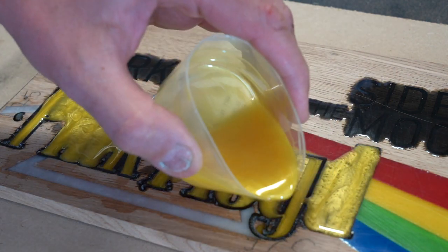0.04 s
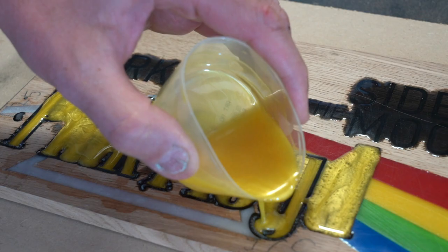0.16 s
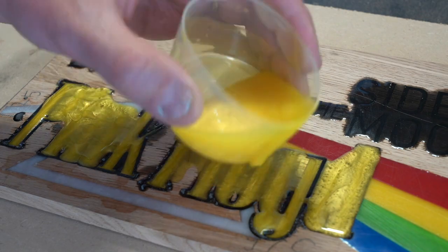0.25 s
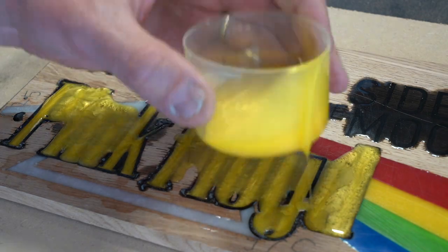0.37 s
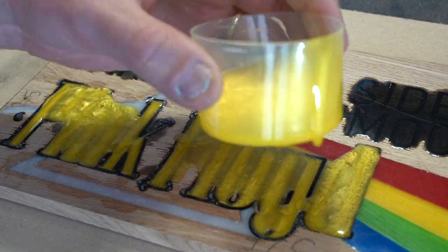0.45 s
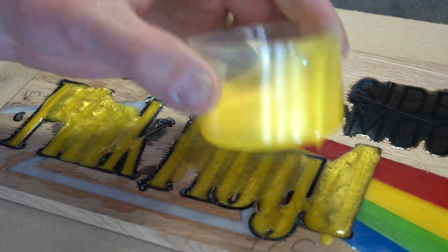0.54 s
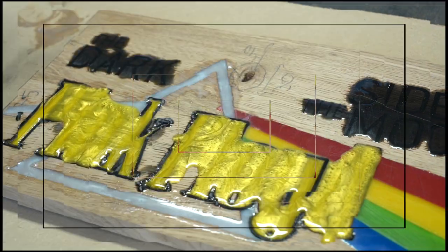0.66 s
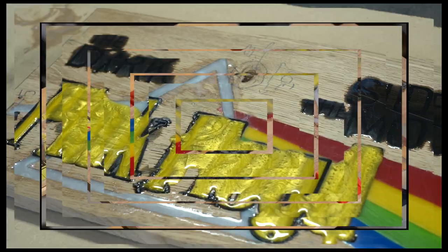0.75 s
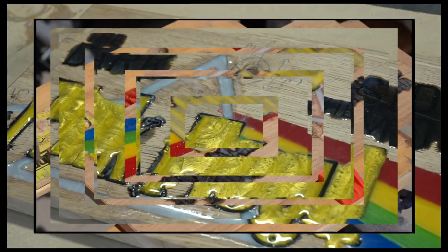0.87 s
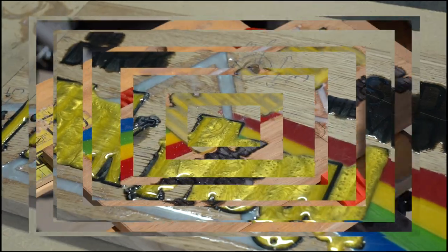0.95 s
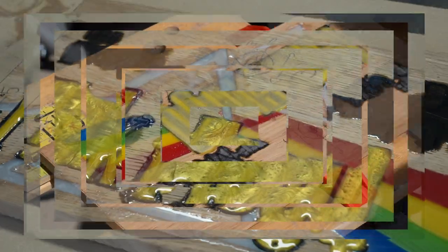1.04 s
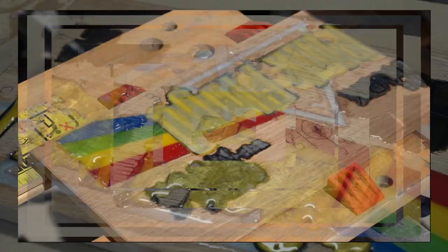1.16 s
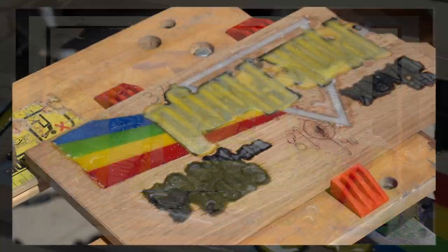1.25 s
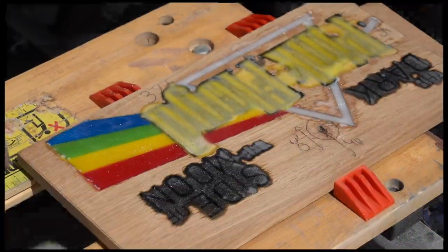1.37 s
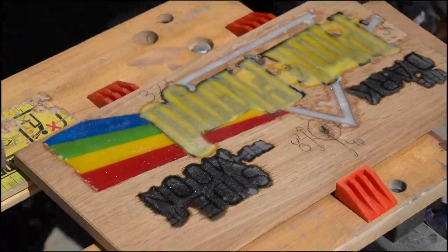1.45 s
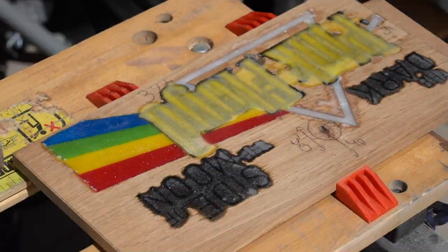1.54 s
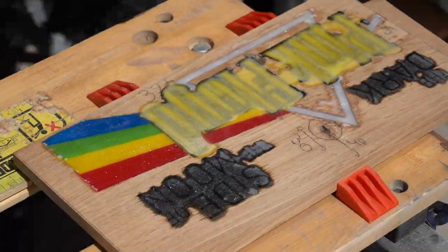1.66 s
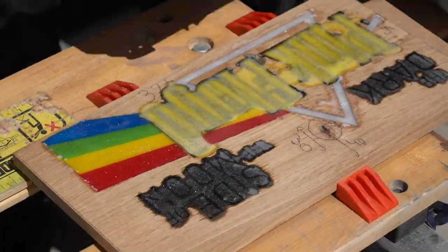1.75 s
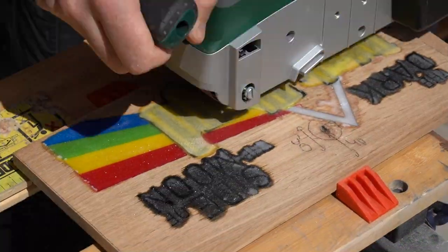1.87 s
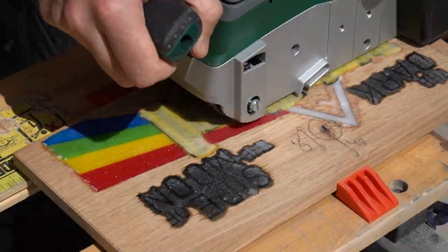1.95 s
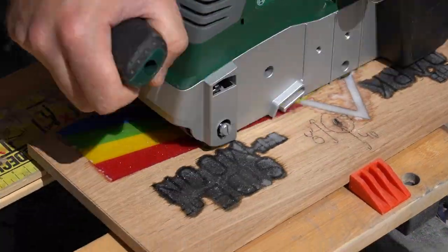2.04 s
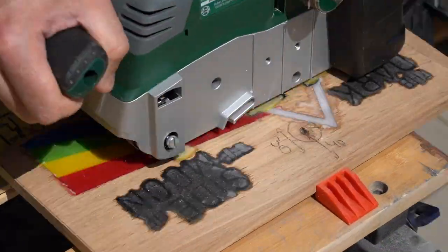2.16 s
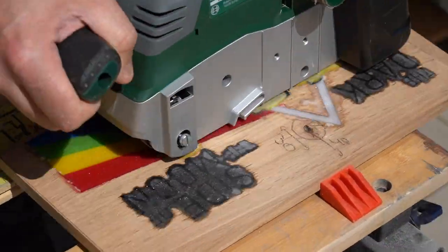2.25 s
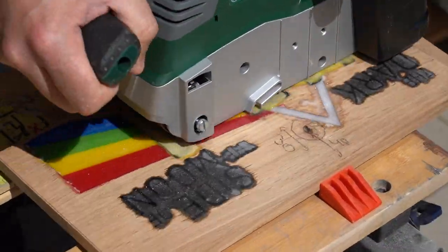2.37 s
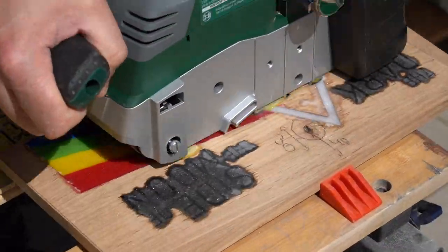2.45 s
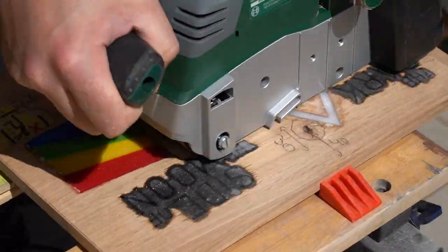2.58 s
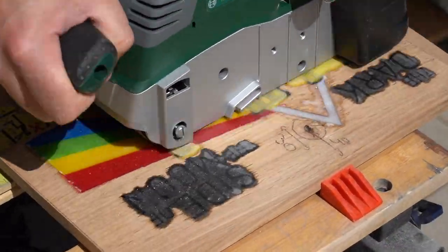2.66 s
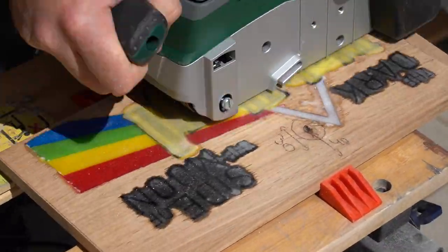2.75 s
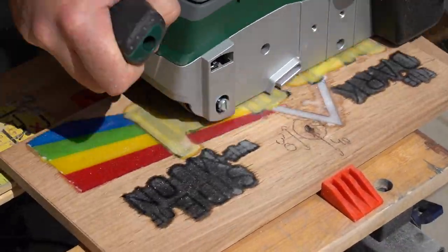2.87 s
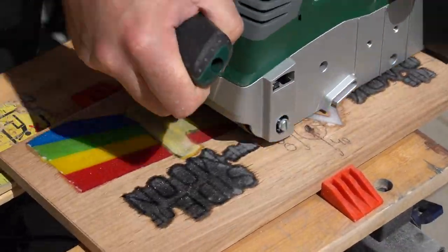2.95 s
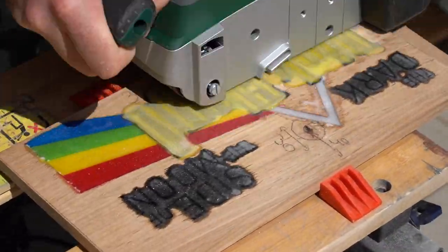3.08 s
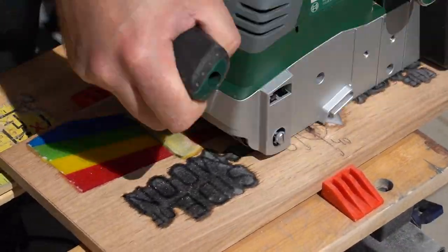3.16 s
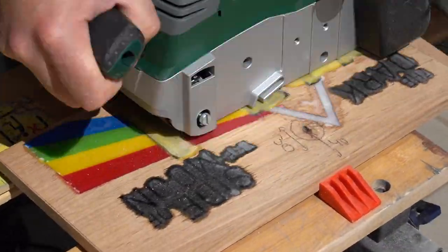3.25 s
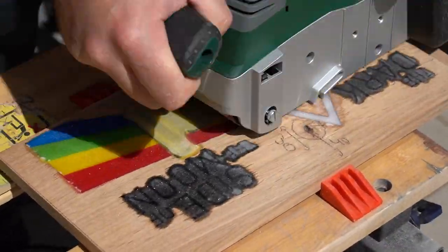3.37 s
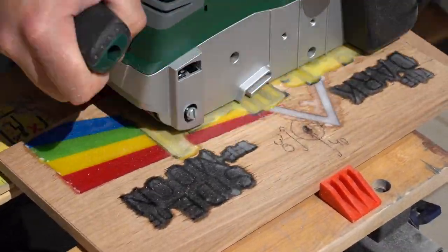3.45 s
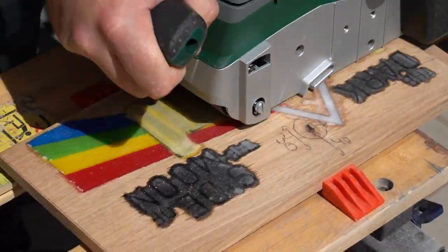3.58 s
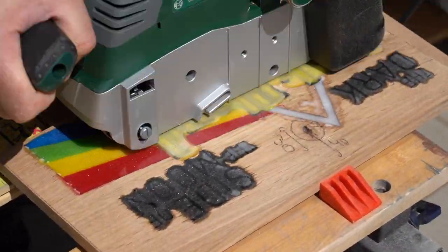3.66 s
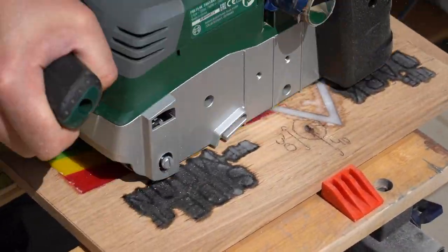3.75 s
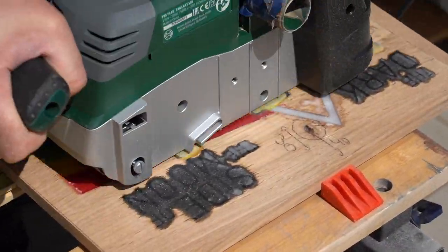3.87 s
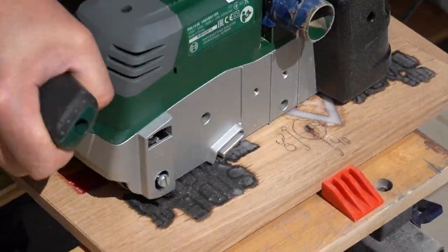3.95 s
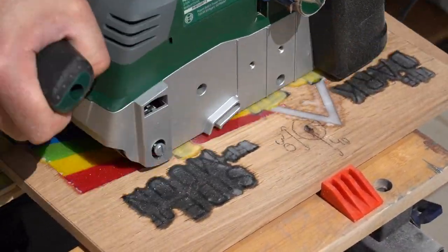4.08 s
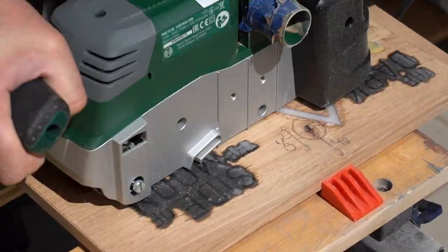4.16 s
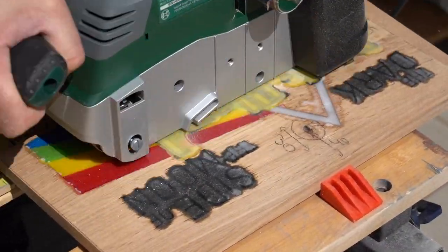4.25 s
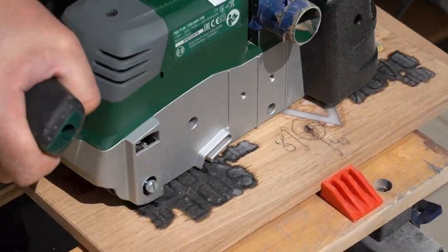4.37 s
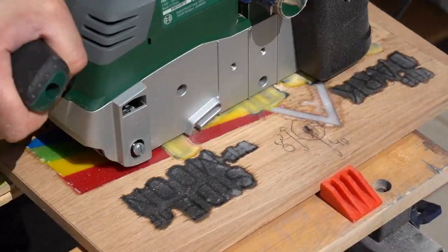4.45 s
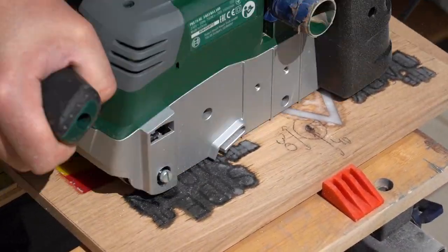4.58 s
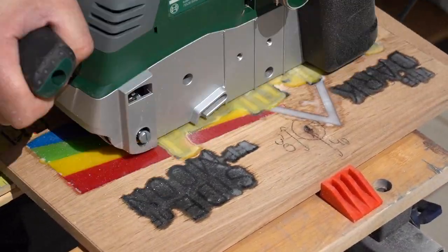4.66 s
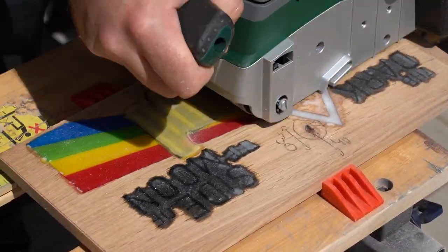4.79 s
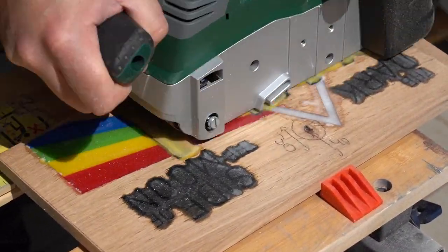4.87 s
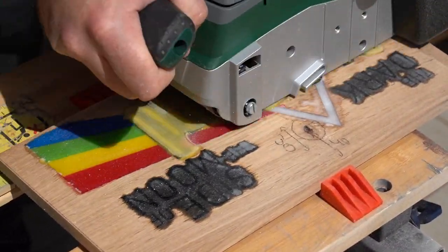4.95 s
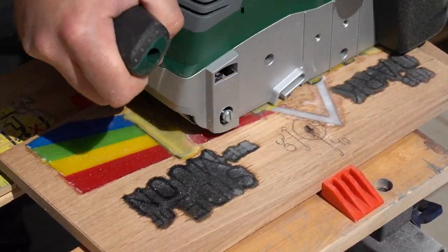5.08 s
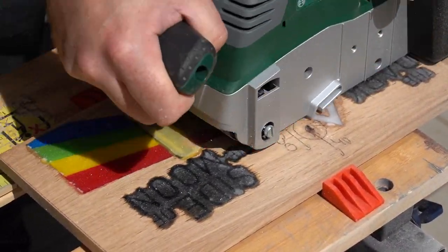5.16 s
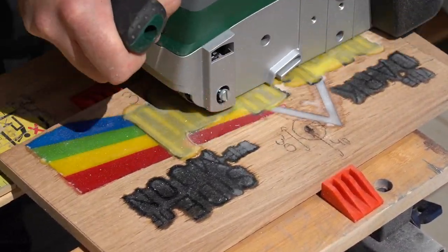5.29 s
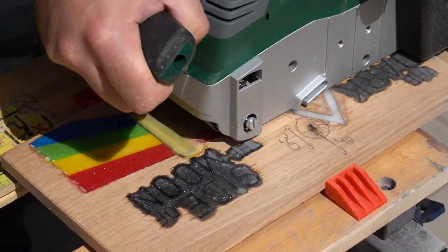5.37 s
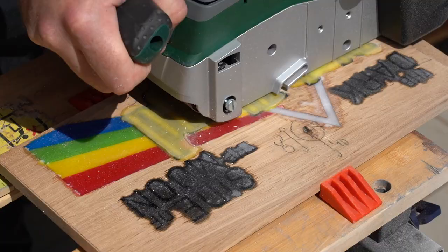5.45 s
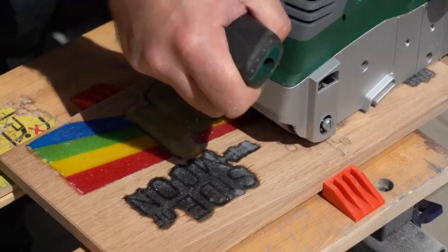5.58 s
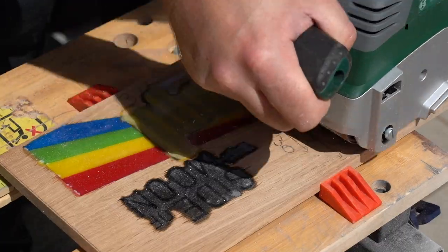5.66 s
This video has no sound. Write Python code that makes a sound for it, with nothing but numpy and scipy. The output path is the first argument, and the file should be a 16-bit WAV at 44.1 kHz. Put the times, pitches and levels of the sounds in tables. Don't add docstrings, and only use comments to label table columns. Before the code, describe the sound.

A quiet room with a steady low fan hum and soft hiss fades away over under a second, a sharp wooden knock at its start. Faint outdoor air follows, with a light tap, a short gritty scrape and a tiny bird chirp. Then a belt sander switches on close by, races up to a high whine, drops in pitch as it meets the board, and grinds loudly to the end. Stereo, close, dry.

```python
import sys
import numpy as np
from scipy import signal
from scipy.fft import rfft, irfft, next_fast_len
from scipy.io import wavfile

SR = 44100
rng = np.random.default_rng(int(sys.argv[2]) if len(sys.argv) > 2 else 0)


def makeup_ratio(level_db):
    decades = np.asarray(level_db, float) / 20
    return 10 ** decades


def materialize(psi):
    bounded = np.clip(np.atleast_2d(psi).T, -1, 1)
    quanta = np.round(bounded * 32767).astype(np.int16)
    wavfile.write(sys.argv[1], SR, quanta)


N = 252252

# [f/Hz, density/dB]
VENT_RUMBLE = [(15, -46), (25, -17), (108, -2), (167, -11), (301, -13), (535, -5), (593, -14.5),
               (719, -2.5), (870, -13.5), (1600, -19), (2080, -54), (3520, -120)]
# [f/Hz, density/dB]
VENT_HISS = [(530, -57), (900, -8), (1290, -9), (1420, -10), (1700, -6.5), (2030, -4.5), (2570, -4),
             (2720, -6.5), (4920, -8.5), (13000, -20.5)]
# [f/Hz, density/dB]
FIZZ = [(6470, -13), (11000, -12.5), (13000, -22), (15300, 2), (15800, 5), (16300, -5), (16500, -39)]
# [f/Hz, width/Hz, level/dB]
DUCT_MODES = [(87, 2.3, -3), (112.5, 7.3, 1.5), (197, 13, -8), (302, 62, -2.5), (445.6, 10, -0.5),
              (518, 31, -9.5), (705, 38, -3.5), (944, 12.5, -9.5), (1424, 30, -13)]
# [f/Hz, level/dB]
SLOT_TONES = [(1600, -12), (1800, -8), (1999, 0), (2800, -10), (4230, -16), (5000, -18)]
# [t/s, length/s, gain/dB]
SLOT_SWELLS = [
    (-.1, 0.5, 10.5),
    (.49, 0.14, 14.5),
    (0.787, 0.095, 10),
    (.97, 0.065, 13),
]
# [f/Hz, correlation/1]
INDOOR_LIKENESS = [(60, 1), (130, .995), (290, .94), (640, .6), (1410, -.08), (3100, -.2), (15000, 0)]
# [f/Hz, level/dB]
INDOOR_BALANCE = [(60, 0), (250, -.5), (550, -3.5), (1650, -1), (5000, -1), (15000, -2)]
# [t/s, peak level/dB, f/Hz, t60/s, crack level/dB]
KNOCKS = [
    (0.802, -38, 472, 0.12, 2),
    (0.814, -39, 196, 0.23, -23),
    (1.5095, -48, 407, 0.047, -8),
    (1.643, -58, 305, 0.05, -14),
]
# [f/Hz, density/dB]
AIR = [(30, -40), (55, -24), (110, -18), (300, -18), (800, -20), (2000, -27), (4500, -31), (7000, -35),
       (16500, -42)]
# [f/Hz, width/Hz, level/dB]
FAR_HUM = [(66, 16, -3)]
# [f/Hz, density/dB]
SLIDE = [(180, -48), (300, -18), (1230, -14.5), (1830, -7), (2880, -9.5), (3770, -10), (6670, -15),
         (11200, -20.5), (16500, -30)]
# [t/s, f/Hz, level/dB]
BIRD_NOTE = [(1.678, 4760, -93), (1.685, 5130, -65), (1.692, 5500, -69), (1.705, 5580, -66),
             (1.72, 5500, -66), (1.732, 5360, -67), (1.739, 4750, -70), (1.744, 3900, -77),
             (1.746, 3800, -100)]
# [delay/s, level/dB]
BIRD_ECHOES = [(.012, -12), (.024, -6), (.045, -8)]
# [f/Hz, correlation/1]
OUTDOOR_LIKENESS = [(60, 1), (290, .99), (640, .9), (1410, .62), (3100, .58), (6820, .5), (15000, .45)]
# [f/Hz, level/dB]
OUTDOOR_BALANCE = [(60, 0), (250, 0), (640, -.5), (1410, -1.5), (4000, 0), (6820, -2), (15000, -.3)]
# [t/s, speed/turns per s]
LOADED_SPEED = [(2.26, 301.6), (2.35, 289.5), (2.51, 312.5), (2.86, 311), (2.97, 300), (3.29, 289),
                (3.41, 299.4), (3.58, 294.5), (3.745, 275.5), (3.84, 285.5), (4.43, 283.5), (4.58, 293),
                (4.69, 285.5), (4.86, 290.5), (5.13, 275.5), (5.3, 279.5), (5.46, 273.5), (5.69, 282.4)]
# [t/s, gear mesh level/dB, its octave level/dB, fan blades level/dB, mesh twelfth level/dB]
STAGES = [
    (1.77, -70, -64, -51, -70),
    (1.815, -70, -62, -44.5, -70),
    (1.885, -50, -55, -68, -61),
    (2.01, -46, -47, -70, -61),
    (2.18, -58, -70, -62, -70),
    (2.235, -64, -42, -62, -70),
    (2.335, -62, -52, -51, -60),
    (2.43, -44, -44.2, -53, -50.5),
]
# [multiple/1, level re louder of mesh and octave/dB]
ROTOR_ORDERS = [(4, -21), (5, -18), (6, -12), (8, -11), (9, -16), (11, -14), (12, -17), (13, -20),
                (17, -19), (24, -19), (27, -19), (28, -22)]
# [t/s, level/dB]
EFFORT = [(1.77, -76), (1.79, -62), (1.85, -53), (1.96, -47.5), (2.15, -48.5), (2.32, -55.5), (2.44, -49),
          (3.72, -50), (3.77, -48), (3.96, -49), (5.55, -49.5), (5.72, -49)]
# [f/Hz, density/dB]
BOARD = [(18, -73), (30, -52), (75, -19.5), (217, -19.5), (302, -7.5), (405, -4.5), (474, -2), (1070, -2.5),
         (1800, -20.5), (1900, -4.5), (2470, -11), (4180, -120)]
# [f/Hz, density/dB]
HOUSING = [(900, -23), (1300, -1.5), (1550, 3), (1900, -3), (2400, -1), (3000, 2), (3600, -3.5),
           (4600, -6.5), (6000, -11.5), (7500, -44)]
# [f/Hz, density/dB]
GRIT = [(2650, -10.5), (4500, -8), (4620, -7.5), (5970, -6), (8920, -9.5), (13900, -17), (16000, -19.5),
        (16200, -38), (16500, -54)]

RUMBLE_DB, HISS_DB, FIZZ_DB, SLOT_DB = -42.5, -52, -57.5, -72
FADE_START_S, FADE_END_S = 0.78, 1.546
RUMBLE_FADE, HISS_FADE, FIZZ_FADE, SLOT_FADE = 1.46, 0.94, 1.7, 2.2
SWELL_EDGE_S = .04
AIR_START_S, AIR_RISE_S, AIR_DB, AIR_UNDER_SANDER_DB = 1.16, 0.19, -72, -13.5
SLIDE_PEAK_S, SLIDE_STOP_S, SLIDE_DB = 1.611, 1.68, -59
SLIDE_WIDTH_S, SLIDE_STOP_DB_PER_S = 0.026, 2500
SWITCH_S, TOUCH_S, SEATED_S = 1.769, 2.04, 2.26
START_TURNS_PER_S, FREE_TURNS_PER_S, RUN_UP_S = 205, 403, .125
GEAR_RATIO = 7 / 48
STAGE_GLIDE_S, AT_REST_DB = .03, -70
USUAL_TURNS_PER_S, TONE_DB_PER_TURN, TONE_WANDER_DB = 290, [-.05, .09, -.3, -.05], .7
GRIT_DB, WOBBLE_DB = 1, .5
BOARD_DB, BOARD_FOLLOWS = -55, 0.47
HOUSING_DB, HOUSING_FOLLOWS = -48, 0.16
HOUSING_KICK_DB, HOUSING_RISE_S = 3.5, 0.013


def seconds():
    return np.arange(N) / SR


def rms_one(x):
    return x / np.sqrt(np.mean(x ** 2) + 1e-20)


def in_time(rows):
    s, *columns = np.transpose(rows)
    return [np.interp(seconds(), s, column) for column in columns]


def at_hz(points, hz):
    point_hz, value = np.transpose(points)
    return np.interp(np.log(hz), np.log(point_hz), value)


def drift(rate_hz):
    r = np.exp(-32 * np.pi * rate_hz / SR)
    noise = rng.standard_normal(N // 16 + 3002)
    slow = signal.lfilter([1], [1, -2 * r, r * r], noise)[3000:]
    return np.interp(np.arange(N) / 16, np.arange(len(slow)), rms_one(slow))


def ring(x, hz, width_hz):
    r = np.exp(-np.pi * width_hz / SR)
    zeros = np.array([1, 0, -1]) * (1 - r * r) / 2
    poles = [1, -2 * r * np.cos(2 * np.pi * hz / SR), r * r]
    return signal.lfilter(zeros, poles, x + 1e-18)


def coloured(spectrum, likeness, balance, patchy_db, peaks=()):
    size = next_fast_len(N)
    hz = np.maximum(np.arange(size // 2 + 1) * SR / size, 1)
    low_hz, high_hz = spectrum[0][0], spectrum[-1][0]
    power = makeup_ratio(at_hz(spectrum, hz)) ** 2
    for peak_hz, width_hz, peak_db in peaks:
        power = power + makeup_ratio(peak_db) ** 2 / (1 + (2 * (hz - peak_hz) / width_hz) ** 2) ** 2
    power[(hz < low_hz / 2) | (hz > 2 * high_hz)] = 0

    mid, side = rfft(rng.standard_normal((2, size)))
    alike = np.clip(at_hz(likeness, hz), -1, 1)
    both = np.sqrt(1 + alike) * mid + np.sqrt(1 - alike) * side * [[1], [-1]]
    both = both * np.sqrt(power) * makeup_ratio(at_hz(balance, hz) * [[.5], [-.5]])

    out = 0
    octave = np.log2(hz / 40)
    together = drift(0.62)
    for k in range(int(np.log2(low_hz / 80)), int(np.log2(high_hz / 20)) + 1):
        share = np.cos(np.pi / 2 * np.clip(octave - k, -1, 1)) ** 2
        band = irfft(both * share, size)[:, :N]
        out = out + band * makeup_ratio(patchy_db * (together + drift(15.0)))
    return out / np.sqrt(np.mean(out.mean(0) ** 2))


def tone(turns, flutter, rate_hz, apart):
    shared = 1 + flutter * (drift(rate_hz) + 1j * drift(rate_hz))
    gap = apart * (rng.choice([-1, 1]) + .4 * drift(2.0))
    lean = makeup_ratio(2 * min(apart, 1) * drift(2.0))
    ears = np.array([lean * np.exp(.5j * gap), np.exp(-.5j * gap) / lean])
    wave = np.real(ears * shared * np.exp(2j * np.pi * turns))
    return np.sqrt(2 / (1 + 2 * flutter ** 2)) * wave


def indoor_levels():
    t = seconds()
    fade_db = 20 * np.log10(np.clip((FADE_END_S - t) / (FADE_END_S - FADE_START_S), 1e-3, 1))
    swell_db = 0
    for s, length_s, gain_db in SLOT_SWELLS:
        inside_s = np.minimum(t - s, s + length_s - t)
        swell_db = swell_db + gain_db * np.clip(inside_s / SWELL_EDGE_S + .5, 0, 1)
    return (RUMBLE_DB + RUMBLE_FADE * fade_db, HISS_DB + HISS_FADE * fade_db,
            FIZZ_DB + FIZZ_FADE * fade_db, SLOT_DB + swell_db + SLOT_FADE * fade_db)


def ventilation():
    rumble_db, hiss_db, fizz_db, slot_db = indoor_levels()
    ducts = [(hz, width_hz, db + 5.5) for hz, width_hz, db in DUCT_MODES]
    rumble = coloured(VENT_RUMBLE, INDOOR_LIKENESS, INDOOR_BALANCE, patchy_db=0.2, peaks=ducts)
    hiss = coloured(VENT_HISS, INDOOR_LIKENESS, INDOOR_BALANCE, patchy_db=1.4)
    fizz = coloured(FIZZ, INDOOR_LIKENESS, INDOOR_BALANCE, patchy_db=-2.0)
    whine = sum(makeup_ratio(db) * tone(hz * seconds(), flutter=.15, rate_hz=6, apart=1.5) for hz, db in SLOT_TONES)
    noise = makeup_ratio(rumble_db) * rumble + makeup_ratio(hiss_db) * hiss + makeup_ratio(fizz_db) * fizz
    closing = np.clip((FADE_END_S - seconds()) * 20, 0, 1)
    return closing * (noise + makeup_ratio(slot_db + 4.0) * whine)


def knocks():
    out = np.zeros(N)
    t = np.arange(SR // 3) / SR
    for s, peak_db, hz, t60_s, crack_db in KNOCKS:
        phase = 2 * np.pi * hz * t
        modes = np.sin(phase) + .4 * np.sin(1.45 * phase) + .4 * np.sin(.55 * phase)
        body = modes * makeup_ratio(-60 * t / t60_s) * np.minimum(t * 1000, 1)
        burst = ring(ring(rng.standard_normal(len(t)), 1200, 1600), 1100, 1300)
        crack = burst * makeup_ratio(crack_db - 60 * t / 0.028) * 2.8
        out[round(s * SR):][:len(t)] += makeup_ratio(peak_db) * (body + crack)
    return out


def open_air():
    t = seconds()
    rise_db = -14 * np.clip(1 - (t - AIR_START_S) / AIR_RISE_S, 0, 1)
    level_db = AIR_DB + rise_db + AIR_UNDER_SANDER_DB * np.clip(t - SWITCH_S, 0, 1)
    air = coloured(AIR, OUTDOOR_LIKENESS, OUTDOOR_BALANCE, patchy_db=0.5, peaks=FAR_HUM)
    return (t > AIR_START_S) * makeup_ratio(level_db) * air


def sliding_tool():
    t = seconds()
    swell_db = SLIDE_DB - ((t - SLIDE_PEAK_S) / SLIDE_WIDTH_S) ** 2
    level_db = swell_db - SLIDE_STOP_DB_PER_S * np.maximum(t - SLIDE_STOP_S, 0)
    grit = coloured(SLIDE, OUTDOOR_LIKENESS, OUTDOOR_BALANCE, patchy_db=-0.5)
    return makeup_ratio(level_db) * grit * makeup_ratio(0.89 * drift(120.0))


def bird():
    hz, db = in_time(BIRD_NOTE)
    note = makeup_ratio(db) * (db > -94) * tone(np.cumsum(hz) / SR, flutter=.2, rate_hz=60, apart=1)
    echoes = sum(makeup_ratio(echo_db) * np.roll(note, round(s * SR), axis=1) for s, echo_db in BIRD_ECHOES)
    return note + echoes


def rotor_speed():
    t = seconds()
    lag = np.exp(-np.maximum(t - SWITCH_S, 0) / RUN_UP_S)
    unloaded = FREE_TURNS_PER_S - (FREE_TURNS_PER_S - START_TURNS_PER_S) * lag
    seated = np.clip((t - TOUCH_S) / (SEATED_S - TOUCH_S), 0, 1) ** 2
    loaded, = in_time(LOADED_SPEED)
    return unloaded + seated * (loaded - unloaded)


def tone_levels(speed):
    s, *columns = np.transpose(STAGES)
    corners_s = np.ravel([s, s + STAGE_GLIDE_S], "F")
    sanding = np.clip((seconds() - s[-1]) / STAGE_GLIDE_S, 0, 1)
    levels = []
    for db, slope in zip(columns, TONE_DB_PER_TURN):
        before_db = np.r_[AT_REST_DB, db[:-1]]
        held_db = np.interp(seconds(), corners_s, np.ravel([before_db, db], "F"))
        shift_db = slope * (speed - USUAL_TURNS_PER_S) + TONE_WANDER_DB * drift(1.54)
        levels.append(held_db + sanding * shift_db)
    return levels


def fan_blades(fan_db, turns, runout):
    stutter = np.interp(seconds() - SWITCH_S, [.15, .3], [.9, .3])
    blades = tone(10 * turns, flutter=.3 + .5 * stutter, rate_hz=110, apart=.7)
    return makeup_ratio(fan_db + 3 * stutter) * (1 + stutter * np.cos(runout + 2)) * blades


def gear_mesh(levels_db, turns, runout, free):
    beat = 1 + .3 * makeup_ratio(3 * drift(3)) * np.cos(runout)
    out = 0
    for k, db in enumerate(levels_db, 1):
        sway = (.022 + .07 * free) * k * np.sin(runout)
        rattle = .25 * free * drift(70)
        flutter = .38 + .07 * k + 2.5 * free / k ** 2
        teeth = tone(7 * k * turns + sway + rattle, flutter, rate_hz=60 + 25 * k, apart=1)
        out = out + makeup_ratio(db - 1 + (5 - 3 * k) * free) * beat * teeth
    return out


def rotor_orders(speed, turns):
    out = 0
    for k, db in ROTOR_ORDERS:
        cover_db = 8 * np.exp(-((k * speed - 3020) / 220) ** 2)
        out = out + makeup_ratio(db + cover_db) * tone(k * turns, flutter=.7, rate_hz=20 + 5 * k, apart=min(k / 8, 1))
    return out


def sander_whine():
    speed = rotor_speed()
    mesh_db, octave_db, fan_db, twelfth_db = tone_levels(speed)
    turns = np.cumsum(speed * (1 + .0035 * drift(14))) / SR
    runout = 2 * np.pi * GEAR_RATIO * turns
    free = np.clip((speed - 330) / 30, 0, 1)
    fan = fan_blades(fan_db, turns, runout)
    mesh = gear_mesh([mesh_db, octave_db, twelfth_db], turns, runout, free)
    orders = makeup_ratio(np.maximum(mesh_db, octave_db) - 6 * free) * rotor_orders(speed, turns)
    unbalance = makeup_ratio(-69.5 + .11 * (speed - 280)) * tone(turns, flutter=.8, rate_hz=12, apart=.1)
    return fan + mesh + orders + unbalance


def noise_levels():
    effort_db, = in_time(EFFORT)
    swing_db = effort_db - np.median(effort_db)
    since_s = np.maximum(seconds() - SWITCH_S, 0)
    kick_db = HOUSING_KICK_DB * np.exp(-since_s / 0.66) - 14 * np.exp(-since_s / HOUSING_RISE_S)
    wobble_db = WOBBLE_DB * drift(3.06)
    board_db = BOARD_DB + BOARD_FOLLOWS * swing_db + wobble_db
    housing_db = HOUSING_DB + kick_db + HOUSING_FOLLOWS * np.maximum(swing_db, -6) + 1.86 * wobble_db
    return board_db, housing_db, effort_db + GRIT_DB + 0.61 * wobble_db


def sander_noise():
    board_db, housing_db, grit_db = noise_levels()
    board = coloured(BOARD, OUTDOOR_LIKENESS, OUTDOOR_BALANCE, patchy_db=0.64)
    housing = coloured(HOUSING, OUTDOOR_LIKENESS, OUTDOOR_BALANCE, patchy_db=1.6)
    grit = coloured(GRIT, OUTDOOR_LIKENESS, OUTDOOR_BALANCE, patchy_db=0.92) * makeup_ratio(0.36 * drift(96.0))
    return makeup_ratio(board_db + 2.5) * board + makeup_ratio(housing_db - 0.5) * housing + makeup_ratio(grit_db + 2.5) * grit


def scene():
    running = np.clip((seconds() - SWITCH_S) / .004, 0, 1)
    sander = running * (sander_whine() + sander_noise())
    return ventilation() + knocks() + open_air() + sliding_tool() + bird() + sander


def band_limit(x):
    return signal.sosfilt(signal.butter(12, 15800, fs=SR, output="sos"), x)


def record(dry):
    return band_limit(dry)


dry = scene()
out = record(dry)
materialize(out)
```